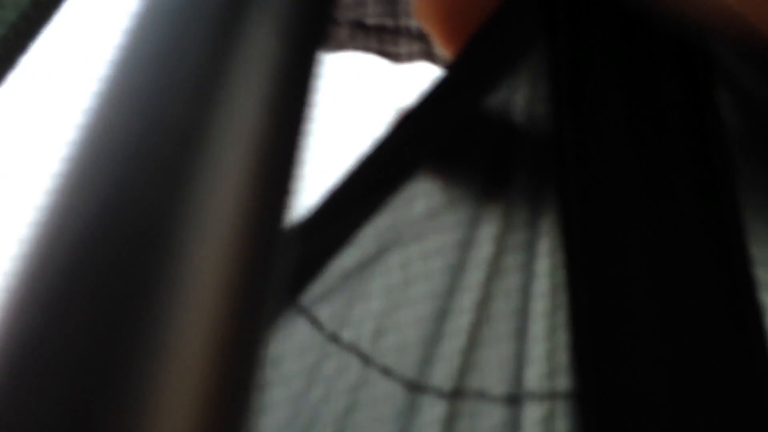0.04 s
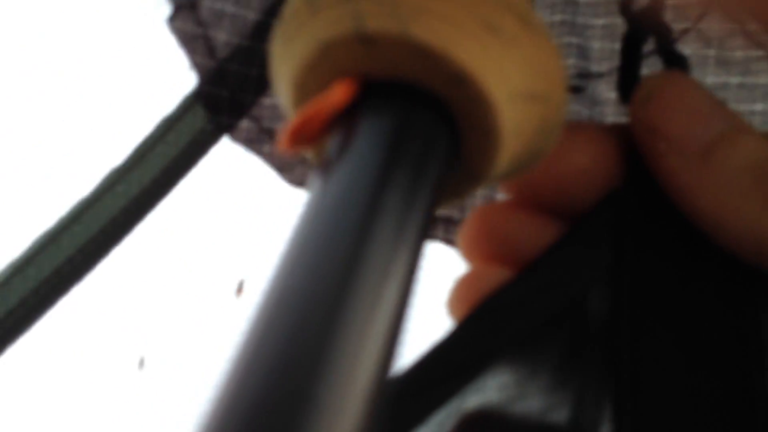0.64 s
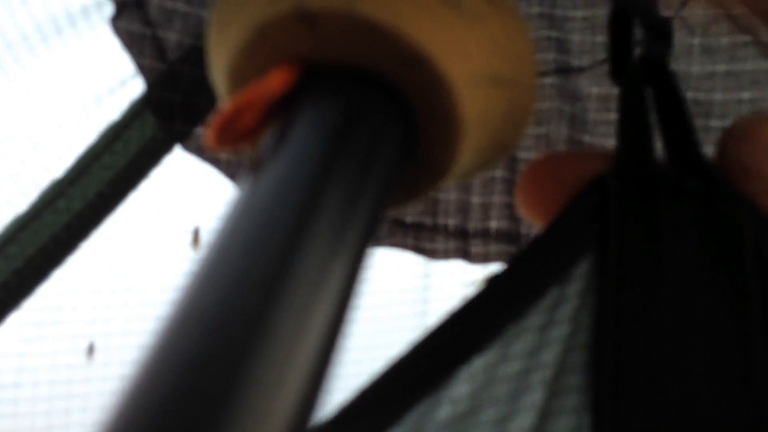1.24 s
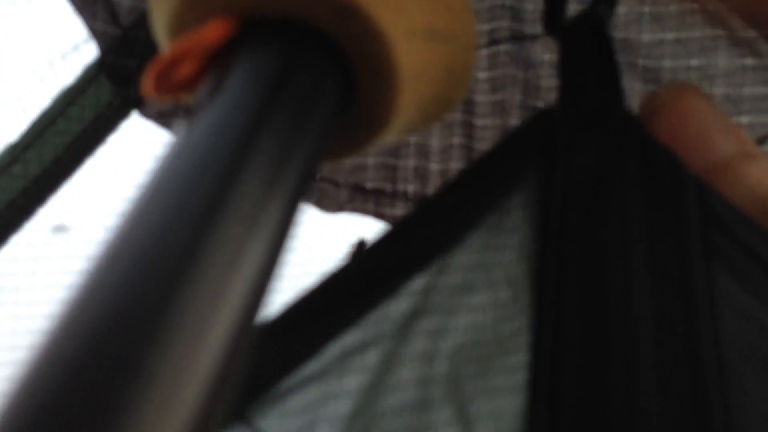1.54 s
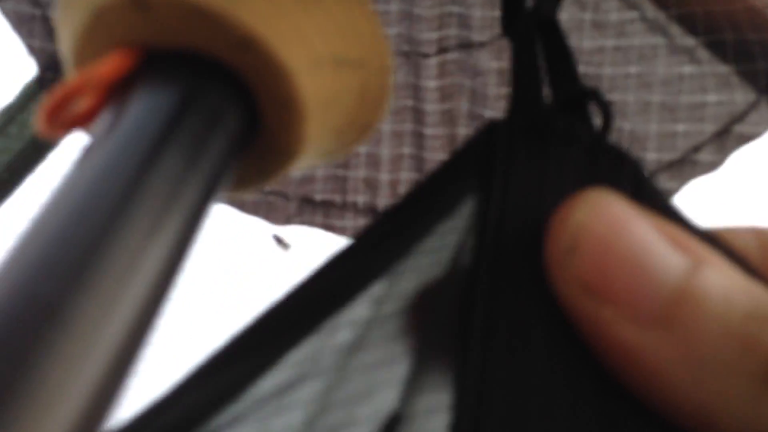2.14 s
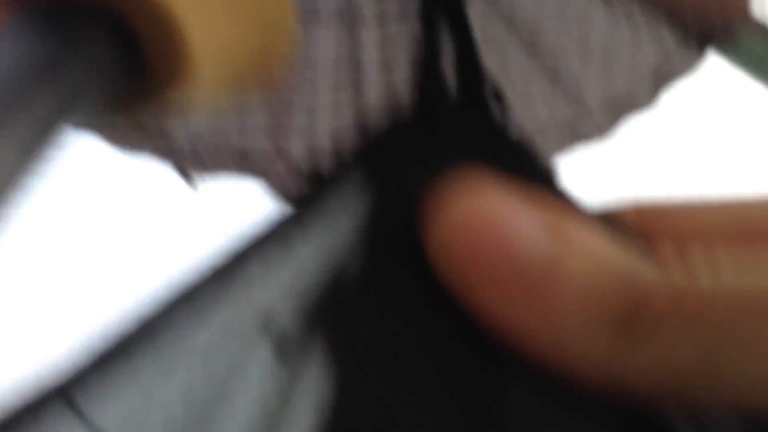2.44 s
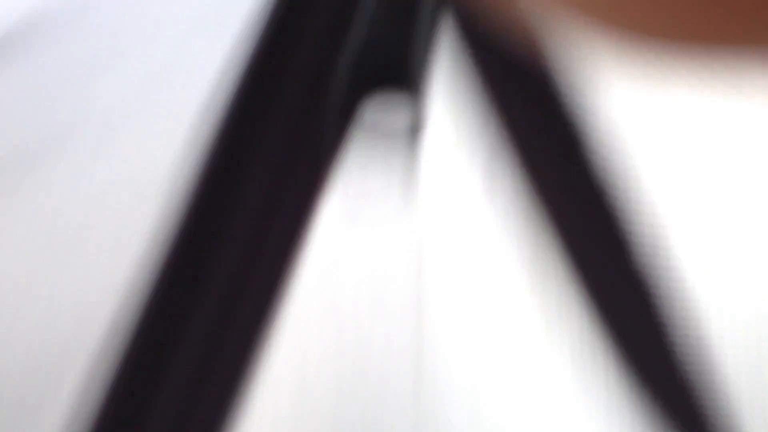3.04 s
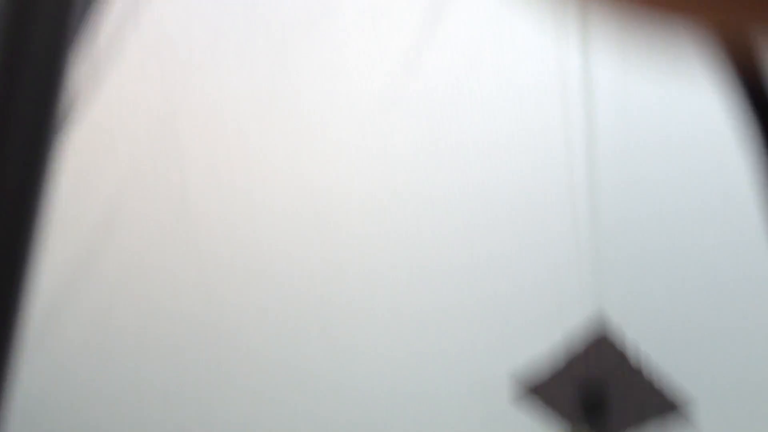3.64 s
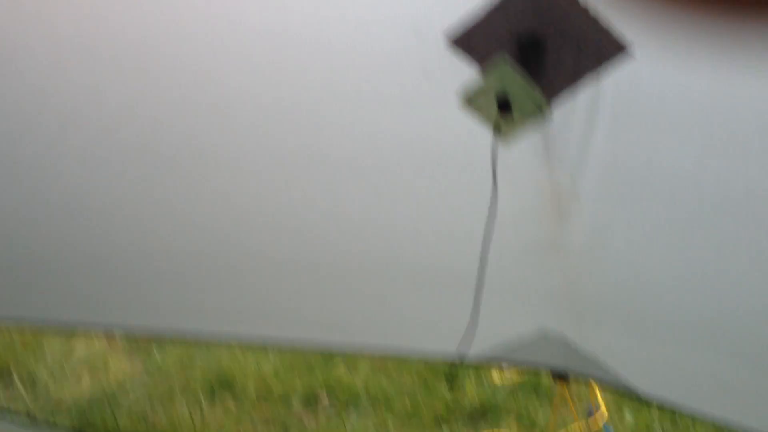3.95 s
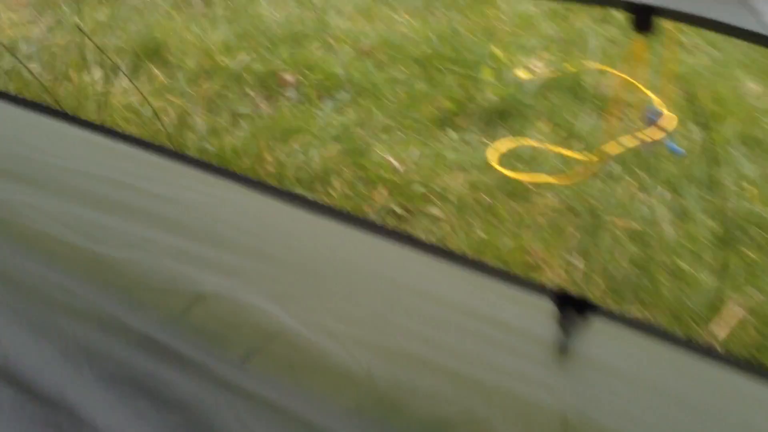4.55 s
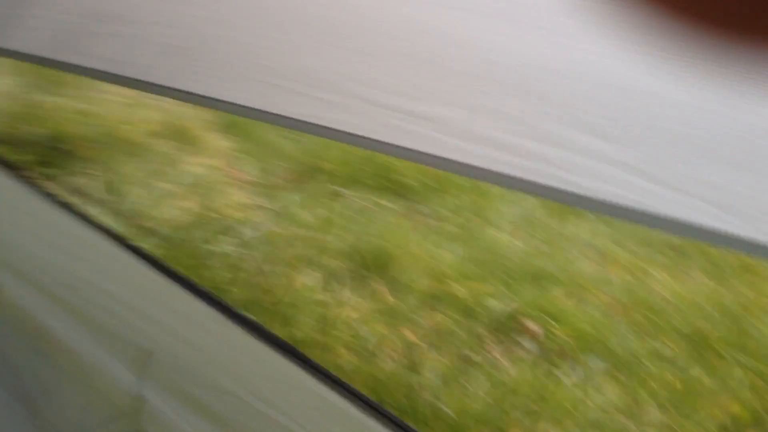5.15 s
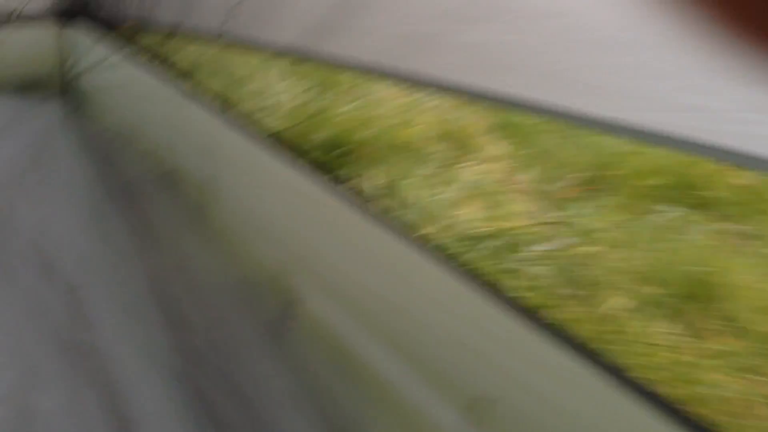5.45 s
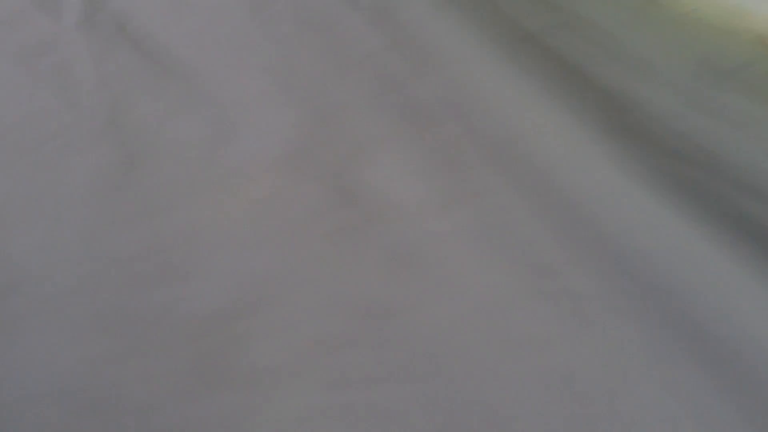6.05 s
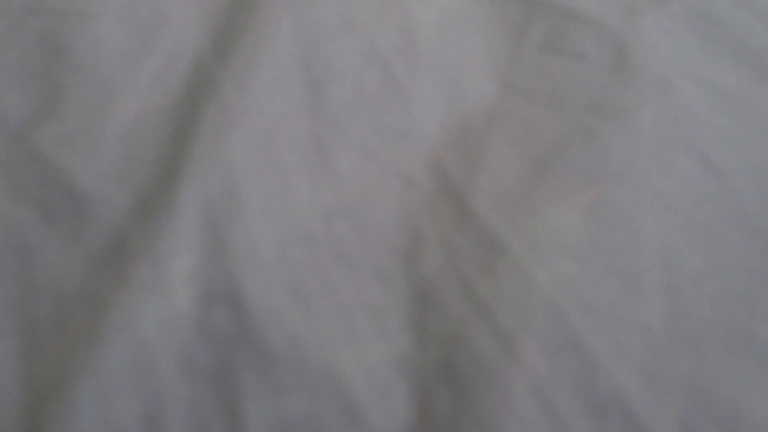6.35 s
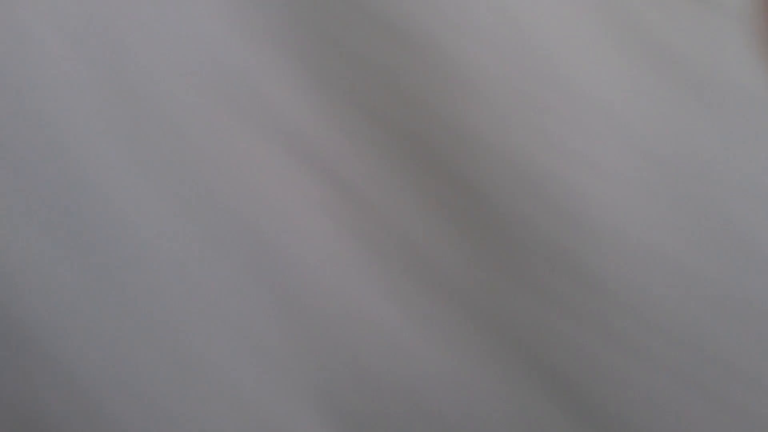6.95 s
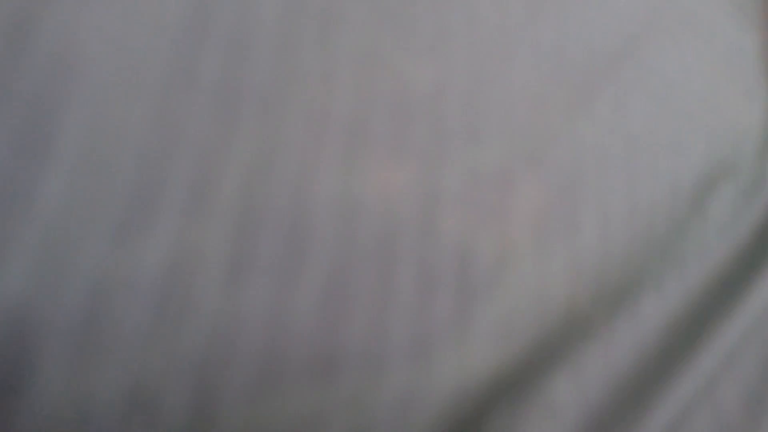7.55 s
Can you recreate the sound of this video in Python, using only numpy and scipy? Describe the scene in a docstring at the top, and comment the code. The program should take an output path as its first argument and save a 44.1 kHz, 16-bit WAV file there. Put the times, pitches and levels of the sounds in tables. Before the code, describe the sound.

Fingers work at a tent's mesh and strap near the microphone, making light hook clicks, then uneven scrapes broken by tiny snaps. A softer hiss of nylon sliding over nylon follows, with one clear swish. Loose tent fabric then drags across the microphone in louder bursts, with crinkles and dull bumps. A faint outdoor rumble and hiss lies underneath.

```python
"""Tent webbing and mesh scrape through a hand, close by, over faint outdoor air.
A hook taps, taut cloth thumps, and the webbing sticks and slips in small snaps and one judder.
From about 3 s nylon swishes over nylon further off. From about 6 s loose folds rustle, crinkle
and flutter against the camera itself."""
import sys
import numpy as np
from scipy import signal
from scipy.fft import rfft, irfft
from scipy.io import wavfile

SR = 44100
rng = np.random.default_rng(int(sys.argv[2]) if len(sys.argv) > 2 else 0)


def transcribe(u):
    """Save the signal u as a 16-bit wav file named by the first command-line argument.

    u: samples, shape (n,) or (channels, n), limited to [-1, 1]; the rate is SR.
    q: integer samples, one column per channel.
    """
    v = np.clip(np.atleast_2d(u).T, -1, 1)
    q = np.round(v * 32767).astype(np.int16)
    wavfile.write(sys.argv[1], SR, q)


N = 343539
TIME_S = np.arange(N) / SR
EVENT_S = TIME_S[:SR // 5]
BINS_HZ = np.fft.rfftfreq(N, 1 / SR) + 1


# Each row: start, rise, hold and release in seconds, rub level in dB, fizz and flutter in dB re rub.
WEBBING_PULLS = [(0.13, 0.11692, 0.008, 0.1208, -43, -10, -8),
                 (0.27, 0.063, 0.01689, 0.1722, -45.5, -9.5, -14),
                 (0.44, 0.0675, 0.0472, 0.3318, -54, -26, -8),
                 (0.8, 0.03186, .005, 0.039, -56.5, -0.5, -1.5),
                 (1.04, 0.0882, .03, .1, -60.5, -3.5, -15.5),
                 (1.15, 0.10344, 0.012, 0.084, -32.5, -4, -18.5),
                 (1.28, 0.013, 0.054, 0.02, -38.5, -21, -7.5),
                 (1.365, 0.016, 0.00868, 0.15, -45, -9.5, -2.5),
                 (1.502, .03, 0.097, 0.0092, -30.5, -6.5, -12.5), (1.63, 0.019, 0.011, 0.07116, -43, -7, 4),
                 (1.69, 0.088, 0.00682, 0.042, -36.5, -12, -8),
                 (1.785, 0.059, 0.033, 0.086, -32.5, -4.5, -10),
                 (1.97, 0.025, 0.041, 0.081, -48, -5.5, 1.5), (2.15, .03, 0.0877, .1, -55, -24, -7.5),
                 (2.29, 0.039, .03, .15, -48, -8.5, -28),
                 (2.38, 0.04271, 0.0084, 0.29, -43.5, -15.5, -14.5),
                 (2.54, 0.08567, .08, 0.42, -36.5, -4, -11), (2.68, 0.06391, 0.031, 0.2, -35, -1, -25),
                 (2.82, 0.035, 0.09866, 0.33, -50, 8, -22), (2.99, 0.06292, 0.05028, 0.037, -48.5, 8, -22)]
# Each row: frequency in Hz, gain in dB.
WEBBING_SPECTRUM = [(30, -6), (70, 0.5), (150, 0), (300, -2), (600, -4.5), (850, -6.5), (1280, -5.5),
                    (2250, -9.5), (2800, -7.5), (4200, -5), (5600, -5.5), (10000, -3), (15500, -5.5)]
def scrape():
    """Webbing and mesh stick and slip through the fingers; the jerky pull shakes the cloth."""
    rub, fizz, flutter = stroke_gains(WEBBING_PULLS, resting_grip_db=(-62, -15, -1))
    friction = slips(per_s=20000, scatter_db=3.5) * undb(1.052 * wander(105.33))
    cloth = colour(folds(friction, depth_db=2.0, rate_hz=35), WEBBING_SPECTRUM)
    slide = undb(-1.27) * brighten(cloth, fizz, low_hz=505, lean=0.4348)
    shake = undb(-1.2) * flutter * band(cloth, 25, 571.1)
    return rub * (slide + shake)


# Each row: start in seconds, peak in dB, ring in Hz, tick in dB re ring.
WEBBING_SNAPS = [(1.2531, -18.5, 4680, -22), (1.301, -10, 4055, -28.5), (1.398, -26, 3770, -17),
                 (1.657, -17.5, 3800, -5), (1.661, -24, 3297, -18), (1.691, -25.5, 4460, -12),
                 (1.848, -18, 4600, -12.5), (1.8667, -15, 4349, -7), (1.9771, -18, 4363, -17.5),
                 (1.986, -22.5, 4160, -13.5), (2.230, -31, 4670, -12.5), (2.428, -24, 4000, -16.5),
                 (2.4373, -15.5, 3970, -15)]
def snaps():
    """Taut webbing catches and lets go: a crack of a few cycles, a short shiver and a dry tick."""
    out = np.zeros(N)
    for start_s, peak_db, hz, tick_db in WEBBING_SNAPS + judder():
        crack = ring(hz, t60_s=0.0022, rise_s=0.0002)
        shiver = 0.085 * ring(hz, t60_s=0.02335, rise_s=0.0005)
        shiver += 0.14 * ring(1370, t60_s=0.0092, rise_s=0.00038)
        tick = undb(tick_db) * burst(2600, 10000, t60_s=0.007803, rise_s=0.000322)
        add(out, start_s - 0.0002, peak_db, crack + shiver + tick)
    return out


def judder(start_s=1.531, count=12, gap_s=0.0088, jitter_s=0.0012):
    """Near-regular stick-slip in the hardest pull: snap rows that weaken and rise as it tightens."""
    first_db, fade_db_per_s, scatter_db, tick_db = -11, 68, 1.5, -10.5
    first_hz, rise_hz_per_s = 3850, 14000
    timing, strength = rng.standard_normal((count, 2)).T
    elapsed_s = gap_s * np.arange(count) + jitter_s * timing
    peaks_db = first_db - fade_db_per_s * elapsed_s - scatter_db * strength
    return [(start_s + s, db, first_hz + rise_hz_per_s * s, tick_db)
            for s, db in zip(elapsed_s, peaks_db)]


# Each row: start, rise, hold and release in seconds, rub level in dB, fizz and flutter in dB re rub.
FOLD_DRAGS = [(6.16, 0.058, 0.018, .1, -37, -10, -18), (6.225, 0.058, 0.095, 0.12357, -29, -9.5, -13),
              (6.46, 0.05762, .06, 0.16, -36, -9, -9.5), (6.64, .07, 0.196, 0.187, -37.5, -10.5, -6),
              (6.76, 0.23, .07, .1, -22, -6, -9), (6.95, 0.095, 0.019, 0.047, -23, -3, -22.5),
              (7.11, 0.043, 0.048, 0.0522, -33.5, -1.5, -2.5), (7.2, 0.045, 0.067, 0.29, -42, -5.5, -5),
              (7.37, 0.062, 0.09345, 0.13, -26.5, 2.5, -8), (7.58, 0.068, 0.026, 0.06818, -26.5, -5, -12),
              (7.72, 0.042, .03, .1, -40.5, -5.5, -9.5)]
# Each row: frequency in Hz, gain in dB.
FOLD_SPECTRUM = [(30, -7), (75, 4.5), (190, 5.5), (420, -1), (560, 1), (800, -1.5), (1750, 3.5),
                 (2300, 2.5), (2850, -3.5), (3700, -1.5), (4900, -9), (7000, -19.5), (15500, -25.5)]
def rustle():
    """Loose folds drag over the camera: creases tick when slow, hiss takes over at speed."""
    rub, fizz, flutter = stroke_gains(FOLD_DRAGS)
    slowness = 1 / (1 + (rub / undb(-33)) ** 2)
    hiss = rng.standard_normal(N) * undb(0.37 * wander(77))
    ticks = undb(0.5) * slowness * slips(per_s=730, scatter_db=4.0)
    cloth = colour(folds(hiss + ticks, depth_db=2.5, rate_hz=45), FOLD_SPECTRUM)
    flaps = undb(1.2 * wander(50)) * band(cloth, 25, 500)
    slide = undb(0.7) * brighten(cloth, fizz, low_hz=463, lean=0.37)
    return rub * (slide + undb(1.1) * flutter * flaps)


# Each row: start, rise, hold and release in seconds, rub level in dB, fizz and flutter in dB re rub.
NYLON_SWEEPS = [(3.06, .12, .15, 0.69, -52.5, -8.5, -8.5), (3.45, 0.14, 0.2391, 0.3, -60.5, -7.5, -8),
                (4.0, 0.094, 0.13, 0.776, -53, -6, -33), (4.22, 0.14, .03, 0.32, -54, -3, -22),
                (4.652, 0.075, 0.009095, .17, -30, -7.5, -35.5), (4.83, 0.058, 0.058, 0.15, -41, -5, -38),
                (5.1, .12, 0.072, 0.26, -50, -7.5, -21), (5.31, 0.081, 0.11, .2, -49.5, -10.5, -18),
                (5.45, 0.1344, 0.083, 0.46, -39.5, -6.5, -25), (5.77, .11, .02, 0.22, -44, -5.5, -16),
                (5.93, 0.1099, 0.16, .12, -49, -10, -9)]
# Each row: frequency in Hz, gain in dB.
NYLON_SPECTRUM = [(100, -20), (250, -23.5), (400, -19.5), (650, -11), (1100, -4.5), (1750, 0), (2350, 0),
                  (2850, -5.5), (3700, -1), (5800, -2), (9000, -4.5), (15500, -8)]
def swish():
    """Nylon slides over nylon: countless tiny slips merge into hiss."""
    rub, fizz, flutter = stroke_gains(NYLON_SWEEPS)
    hiss = rng.standard_normal(N) * undb(0.7413 * wander(46))
    cloth = colour(folds(hiss, depth_db=3.5, rate_hz=16), NYLON_SPECTRUM)
    slide = undb(0.38) * brighten(cloth, fizz, low_hz=219.1, lean=0.81)
    return rub * (slide + flutter * band(cloth, 42.4, 410))


# Each row: start in seconds, peak in dB, pitch in Hz.
CREASE_POPS = [(0.0713, -39, 1340), (2.763, -29.5, 1470), (2.825, -28.5, 1870), (6.275, -17.5, 1900),
               (6.437, -27, 2225), (6.700, -22, 1640), (6.708, -20.5, 1906), (6.774, -19.5, 2350),
               (6.836, -21, 2180), (6.866, -15, 1870), (7.243, -27.5, 1521), (7.31, -22, 1814),
               (7.563, -16, 1760)]
def crinkles():
    """A crease pops through and the sheet around it crackles."""
    out = np.zeros(N)
    for start_s, peak_db, hz in CREASE_POPS:
        pop = ring(hz, t60_s=0.007793, rise_s=0.00023)
        sheet = 0.44 * burst(0.77 * hz, 1.4144 * hz, t60_s=0.021, rise_s=0.00065)
        crackle = 0.23 * burst(2900, 15000, t60_s=0.004853, rise_s=0.00029)
        add(out, start_s, peak_db, pop + sheet + crackle)
    return out


# Each row: start in seconds, peak in dB, pitch in Hz, T60 in seconds.
PANEL_THUMPS = [(0.071, -41.5, 69.5, 0.0978), (0.647, -30, 220, 0.012), (0.776, -28, 133.5, 0.092),
                (0.797, -25.5, 220.6, 0.0525), (1.253, -25.5, 154.4, 0.025), (1.977, -26, 150.6, 0.13),
                (1.985, -24.5, 158, 0.063), (2.067, -37, 293, 0.0513), (2.120, -35, 634, 0.008926),
                (2.438, -22, 204, 0.023), (6.625, -28, 332.7, 0.05217), (6.815, -25.5, 213.5, 0.053),
                (7.117, -28, 251.1, 0.081), (7.149, -22.5, 202.4, 0.0355), (7.198, -24.5, 175, 0.0536),
                (7.444, -20.5, 69.9, 0.132), (7.677, -23.5, 72.46, 0.0852)]
def thumps():
    """Cloth pulled tight or bumped gives a low, damped beat with an inharmonic overtone."""
    out = np.zeros(N)
    for start_s, peak_db, hz, t60_s in PANEL_THUMPS:
        beat = ring(hz, t60_s, rise_s=0.0008113)
        overtone = 0.43 * ring(2.41 * hz, 0.6 * t60_s, rise_s=0.00259)
        puff = 0.24545 * burst(0.4265 * hz, 7.3 * hz, t60_s, rise_s=0.00035)
        add(out, start_s, peak_db, beat + overtone + puff)
    return out


# Each row: start in seconds, peak in dB, boost of the high modes in dB.
HOOK_TAPS = [(0.468, -37.5, 2), (0.643, -41, -5), (0.676, -36, 4.5), (0.7751, -25.5, -12),
             (0.786, -19.5, -25), (0.7913, -26.5, -21), (0.797, -24.5, -19), (0.9565, -43, -18),
             (1.096, -27.5, 6.5)]
# Each row: frequency in Hz, level in dB, T60 in seconds.
HOOK_MODES = [(521.5, -7.5, 0.0183), (1346, -12, 0.02352), (1880, -2, 0.02158), (2367.8, -5.5, 0.01129),
              (3046, -7.5, 0.01843), (4080, -13, 0.01371), (5790, -23.5, 0.00607), (7940, -11, 0.0185)]
def taps(ting_above_hz=5000):
    """A hook touches its mount and rings briefly; a hard touch on its edge brings out the ting."""
    out = np.zeros(N)
    for start_s, peak_db, ting_db in HOOK_TAPS:
        modes = 0
        for hz, mode_db, t60_s in HOOK_MODES:
            contact_db, detune = rng.standard_normal(2) * [1.5, 0.02]
            gain = undb(mode_db + contact_db + ting_db * (hz > ting_above_hz))
            modes += gain * ring(hz * (1 + detune), t60_s, rise_s=0.00067)
        click = 0.41 * burst(760, 8954, t60_s=0.014, rise_s=0.0005646)
        add(out, start_s, peak_db, modes / np.abs(modes).max() + click)
    return out


# Each row: start in seconds, peak in dB, band centre in Hz, length in seconds.
FINGER_SCUFFS = [(0.208, -33, 1144, 0.04), (1.239, -25.5, 1231, 0.01944), (1.566, -29.5, 1300, 0.0217),
                 (2.063, -38, 1313, 0.026), (2.417, -34, 1070, 0.03), (2.751, -28.5, 1210, 0.024),
                 (2.751, -29.5, 565, 0.02435), (2.858, -43, 614.5, 0.098)]
def scuffs():
    """A fingertip drags on webbing; skin damps the treble, leaving a short, hollow rasp."""
    out = np.zeros(N)
    for start_s, peak_db, hz, length_s in FINGER_SCUFFS:
        swell = np.hanning(int(length_s * SR))
        add(out, start_s, peak_db, swell * band_noise(hz / 1.25, hz * 1.25, len(swell)))
    return out


# Each row: frequency in Hz, gain in dB.
AIR_SPECTRUM = [(25, -22.5), (55, 5), (85, 4.5), (150, -4), (450, 0), (750, -10.5), (2000, -2.5),
                (3000, -9), (5000, -9), (15500, -13)]
def air(level_db=-60.5):
    """Faint outdoor rumble and hiss."""
    gain = undb(level_db + 0.4286 * wander(17))
    return gain * unit(colour(rng.standard_normal(N), AIR_SPECTRUM))


def stroke(start_s, rise_s, hold_s, release_s):
    """One movement speeds up, holds, then falls 20 dB per release time."""
    speeding = np.sin(np.pi / 2 * np.clip((TIME_S - start_s) / rise_s, 0, 1)) ** 2
    slowing = np.clip((TIME_S - start_s - rise_s - hold_s) / release_s, 0, 10)
    return speeding * undb(-20 * slowing)


def stroke_gains(strokes, resting_grip_db=None, let_go_s=3.2):
    """Contacts add in power. Returns the rub gain, then fizz and flutter relative to it."""
    contacts = [(stroke(*row[:4]), row[4:]) for row in strokes]
    if resting_grip_db is not None:
        held = np.clip((let_go_s - TIME_S) * 20, 0, 1)
        contacts.append((held, resting_grip_db))
    power = 1e-18
    for envelope, (rub_db, fizz_db, flutter_db) in contacts:
        power += np.outer(undb([0, fizz_db, flutter_db]), undb(rub_db) * envelope) ** 2
    rub, fizz, flutter = np.sqrt(power)
    return rub, fizz / rub, flutter / rub


def slips(per_s, scatter_db):
    """Threads catch and let go: random clicks of unequal size."""
    slipping = rng.random(N) < per_s / SR
    size_db = scatter_db * np.minimum(rng.exponential(size=N), 3.5)
    polarity = np.sign(rng.standard_normal(N))
    return unit(slipping * polarity * undb(size_db))


def folds(x, depth_db, rate_hz):
    """Folds keep changing shape, so each half octave swells and sinks independently."""
    spectrum, out = rfft(x), 0
    half_octaves = 2 * np.log2(np.clip(BINS_HZ, 250, 16000) / 250)
    for centre in range(13):
        swell = np.interp(TIME_S * rate_hz, np.arange(1024), rng.standard_normal(1024))
        weight = np.maximum(1 - np.abs(half_octaves - centre), 0)
        out += irfft(spectrum * weight, N) * undb(depth_db * swell)
    return out


def brighten(cloth, fizz, low_hz, lean):
    """A faster slide adds thread fizz and tilts the rub from hollow body to bright edge."""
    rub = band(cloth, low_hz, 6270)
    body = irfft(rfft(rub) / (1 + (BINS_HZ / 2400) ** 6), N)
    edge_gain = (fizz / undb(-9.5)) ** lean
    tilted = (body + edge_gain * (rub - body)) / np.sqrt((1 + edge_gain ** 2) / 2)
    return tilted + fizz * band(cloth, 5840, 21800)


def fade(t60_s, rise_s):
    """Envelope of a soft contact: brief swell, exponential decay."""
    return (1 - np.exp(-EVENT_S / rise_s)) * np.exp(-np.log(1000) * EVENT_S / t60_s)


def ring(hz, t60_s, rise_s):
    """One damped mode at random phase."""
    return np.sin(2 * np.pi * hz * EVENT_S + rng.uniform(0, 2 * np.pi)) * fade(t60_s, rise_s)


def burst(low_hz, high_hz, t60_s, rise_s):
    """A decaying puff of noise."""
    return unit(band_noise(low_hz, high_hz, len(EVENT_S))) * fade(t60_s, rise_s)


def band_noise(low_hz, high_hz, samples):
    """Band-passed white noise."""
    sos = signal.butter(2, [low_hz, high_hz], "band", fs=SR, output="sos")
    return signal.sosfilt(sos, rng.standard_normal(samples))


def wander(rate_hz):
    """Smooth random drift at rms 1."""
    return band(rng.standard_normal(N), rate_hz / 4, rate_hz, order=2)


def band(x, low_hz, high_hz, order=3):
    """Band-pass, scaled to rms 1."""
    low_cut = 1 + (low_hz / BINS_HZ) ** (2 * order)
    high_cut = 1 + (BINS_HZ / high_hz) ** (2 * order)
    return unit(irfft(rfft(x) / low_cut / high_cut, N))


def colour(x, points):
    """Filter by a curve of (Hz, dB) points."""
    hz, db = np.transpose(points)
    gain = undb(np.interp(np.log(BINS_HZ), np.log(hz), db))
    return irfft(rfft(x) * gain, N)


def add(out, start_s, peak_db, sound):
    """Mix in a short sound at a given peak level."""
    start = int(start_s * SR)
    part = sound[:N - start]
    out[start:start + len(part)] += undb(peak_db) * part / np.abs(sound).max()


def undb(db):
    """Decibels to gain."""
    return 10 ** (np.asarray(db) / 20)


def unit(x):
    """Scale to rms 1."""
    return x / np.sqrt(np.mean(x ** 2))


def scene():
    """Tent handling within arm's reach, over outdoor air, in mono."""
    return (scrape() + swish() + rustle() + snaps() + scuffs()
            + taps() + thumps() + crinkles() + air())[None]


def record(dry, low_hz=42, top_hz=15750):
    """The microphone drops the deepest bass and the very top."""
    high_pass = signal.butter(2, low_hz, "high", fs=SR, output="sos")
    low_pass = signal.ellip(10, 0.2, 80, top_hz, fs=SR, output="sos")
    return signal.sosfilt(low_pass, signal.sosfilt(high_pass, dry))


dry = scene()
out = record(dry)
transcribe(out)
```